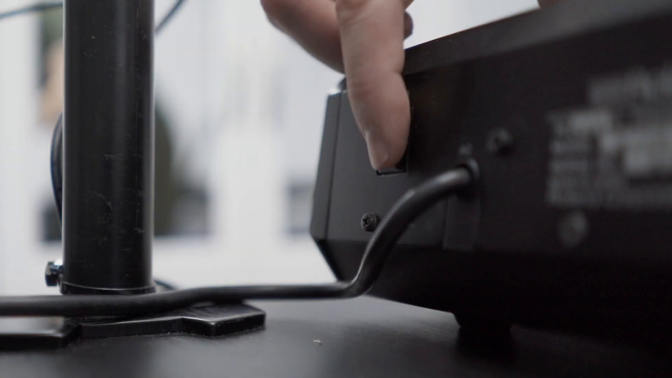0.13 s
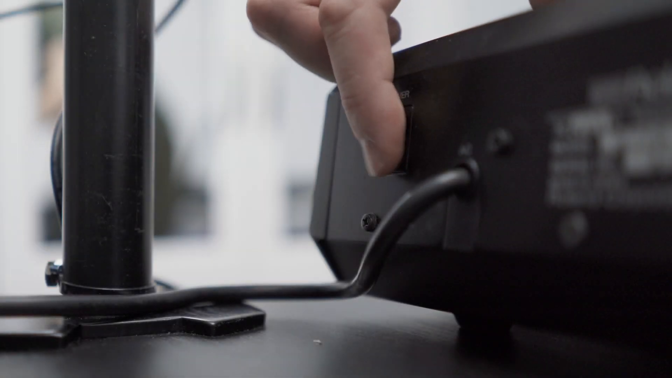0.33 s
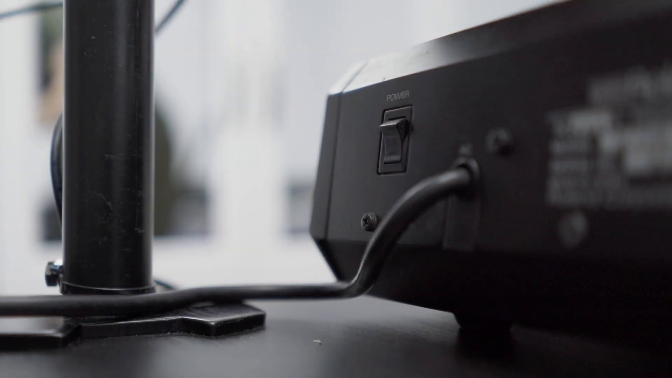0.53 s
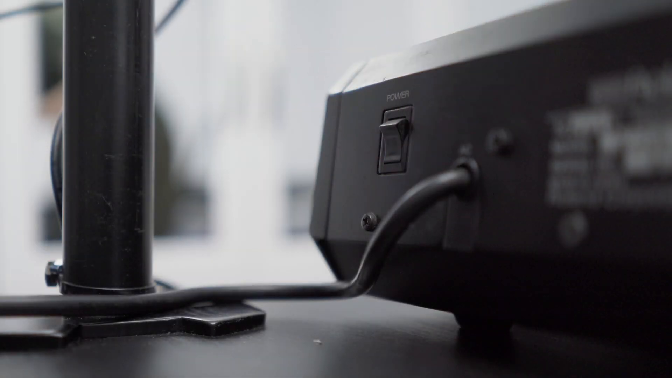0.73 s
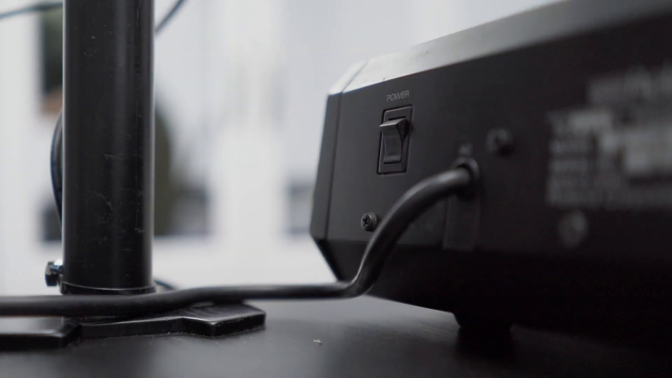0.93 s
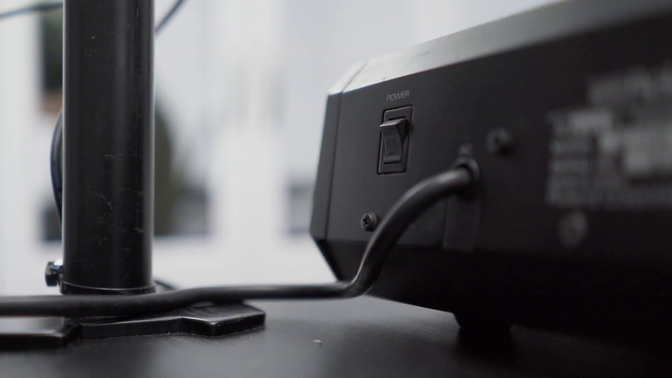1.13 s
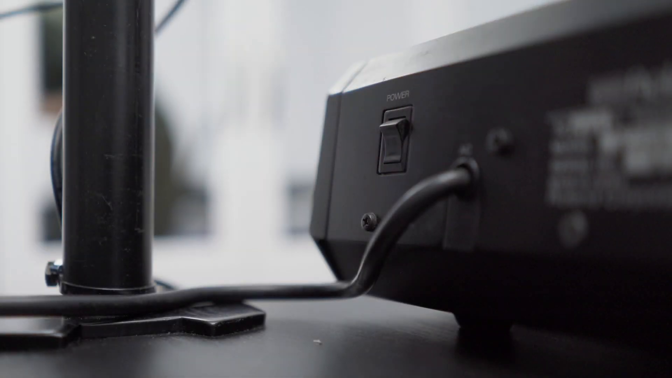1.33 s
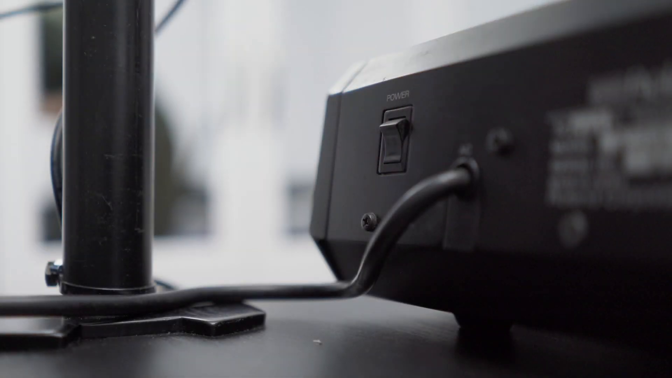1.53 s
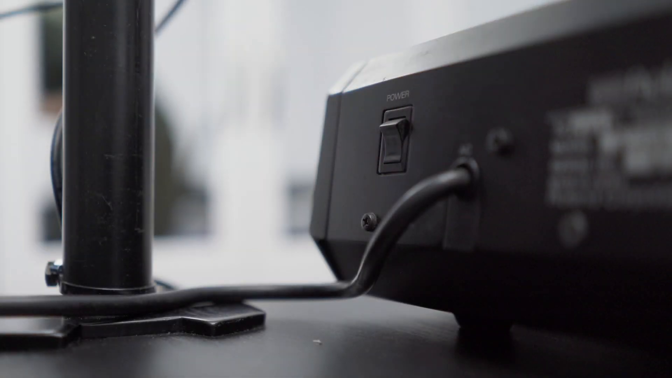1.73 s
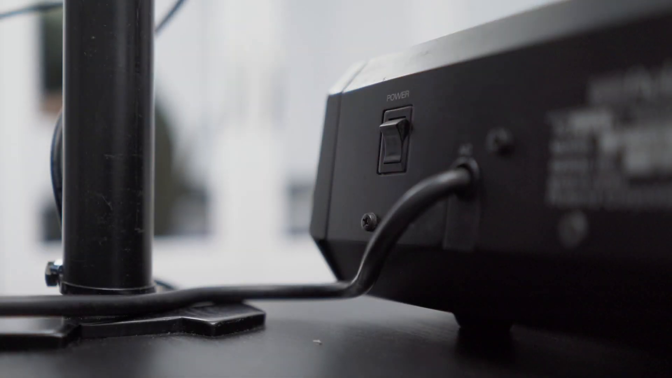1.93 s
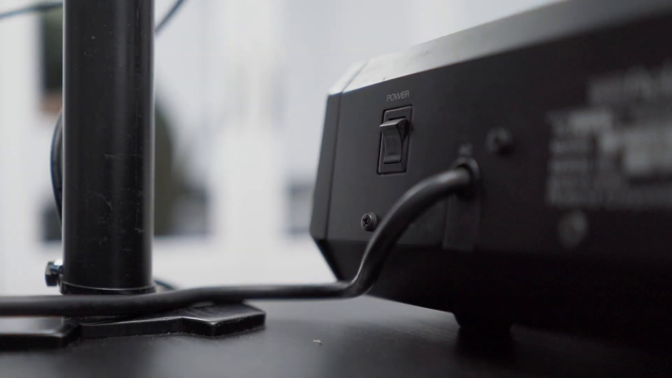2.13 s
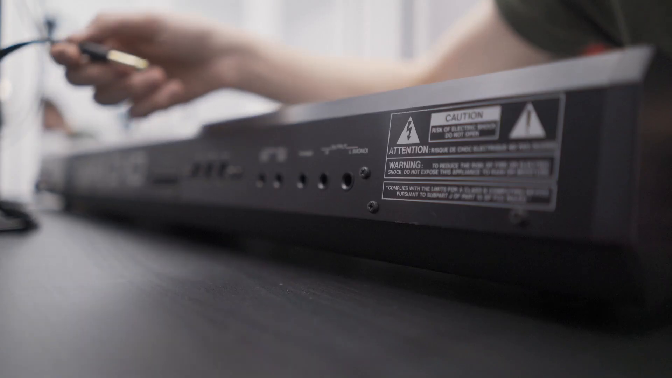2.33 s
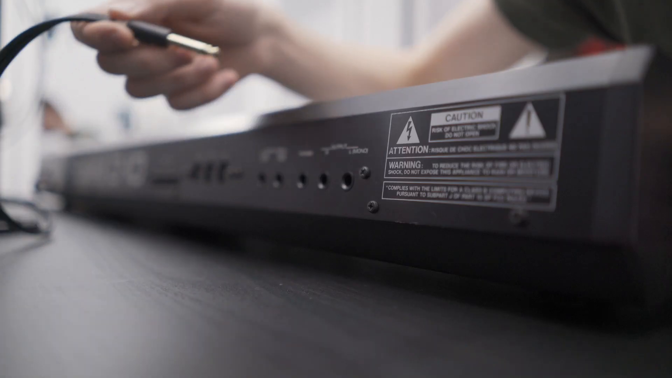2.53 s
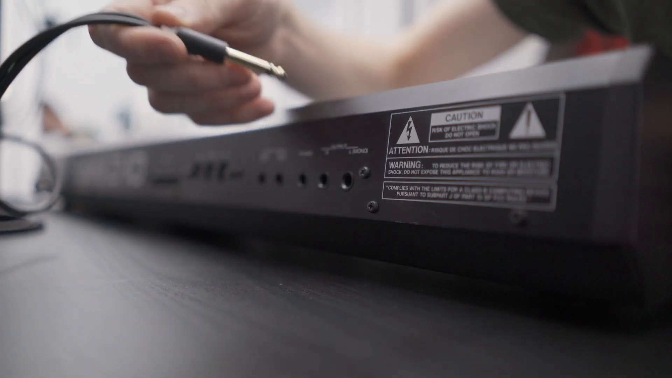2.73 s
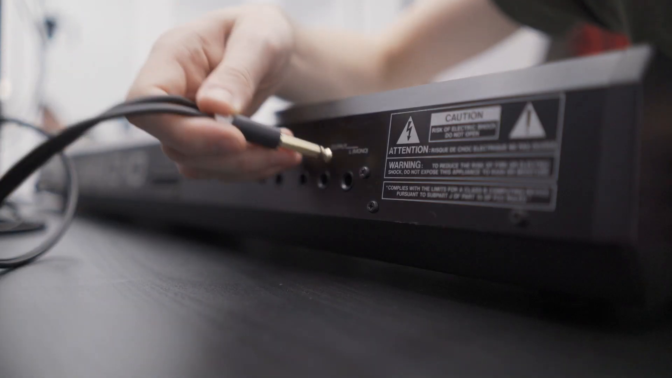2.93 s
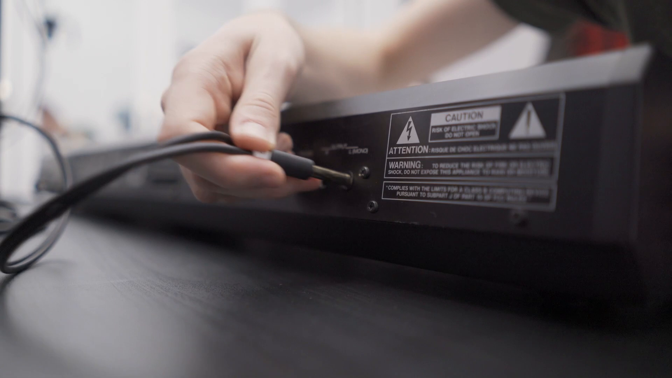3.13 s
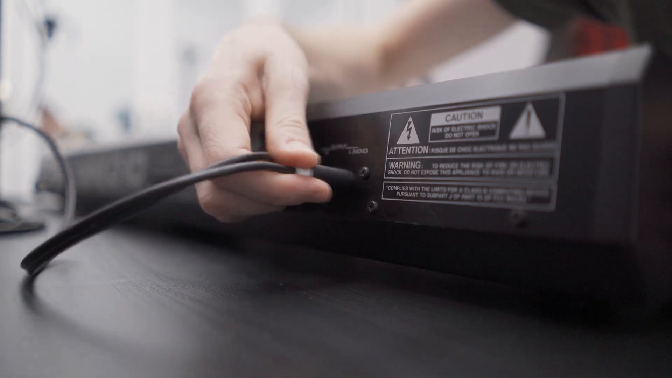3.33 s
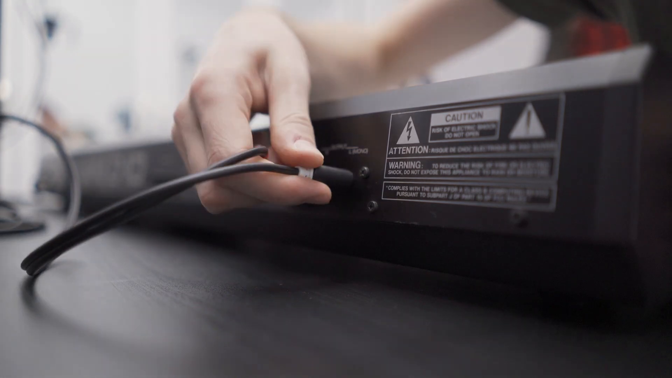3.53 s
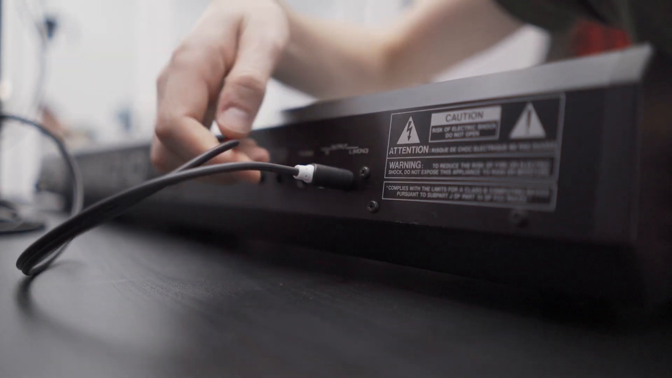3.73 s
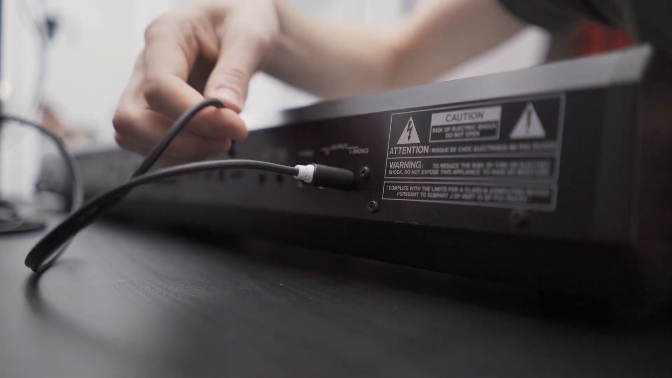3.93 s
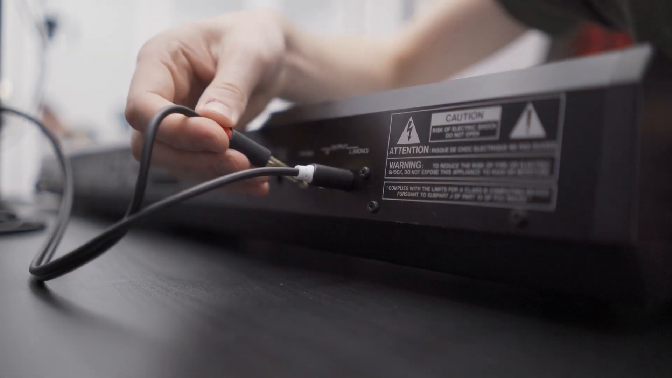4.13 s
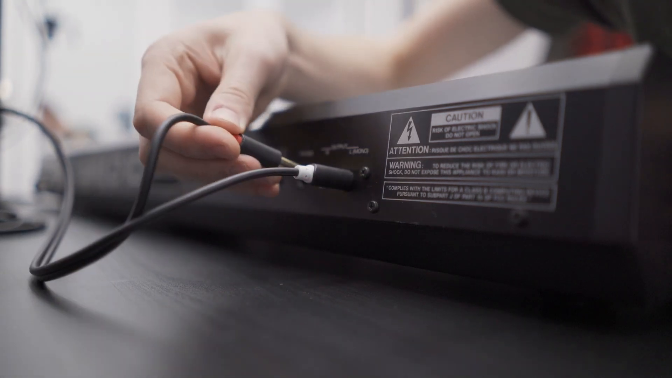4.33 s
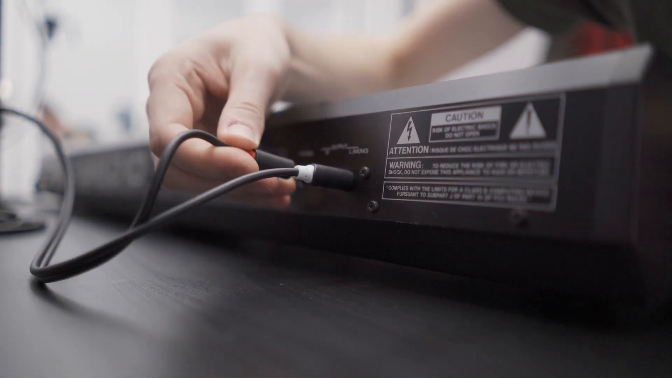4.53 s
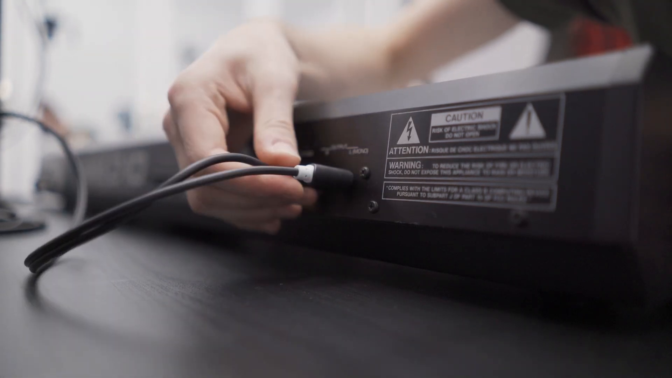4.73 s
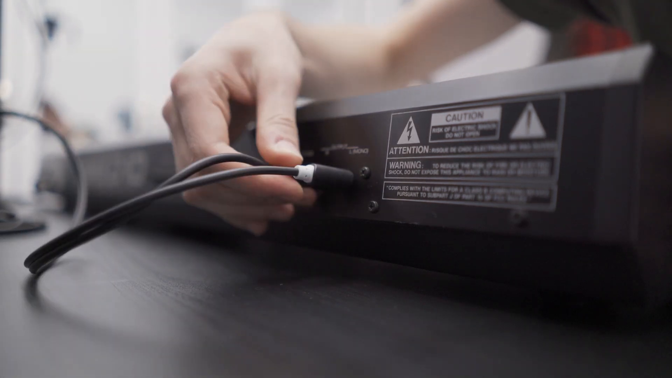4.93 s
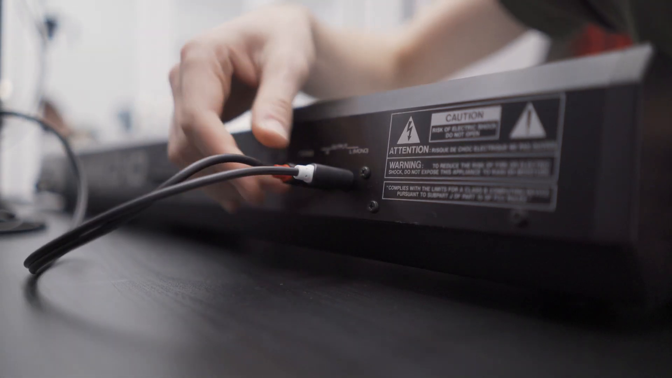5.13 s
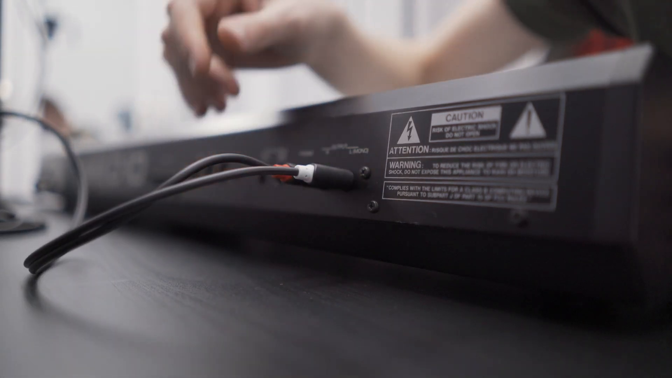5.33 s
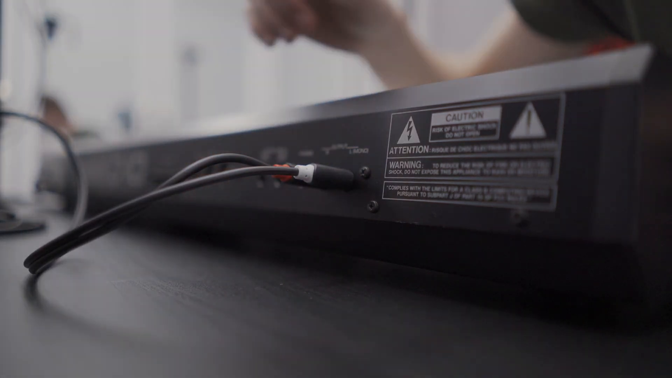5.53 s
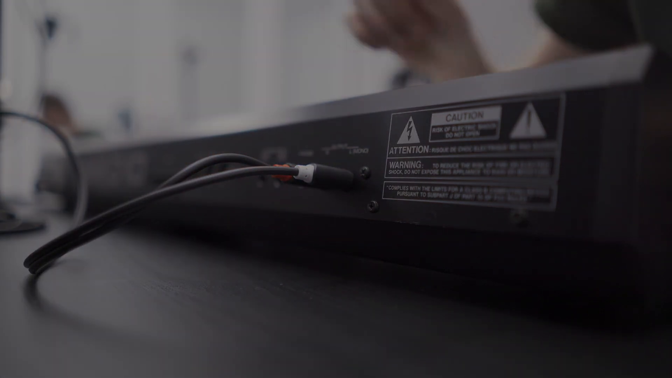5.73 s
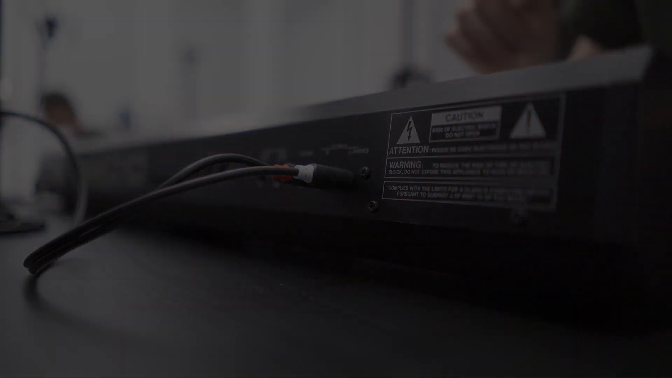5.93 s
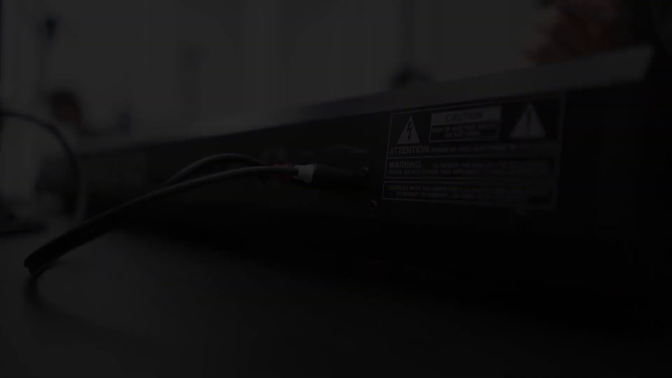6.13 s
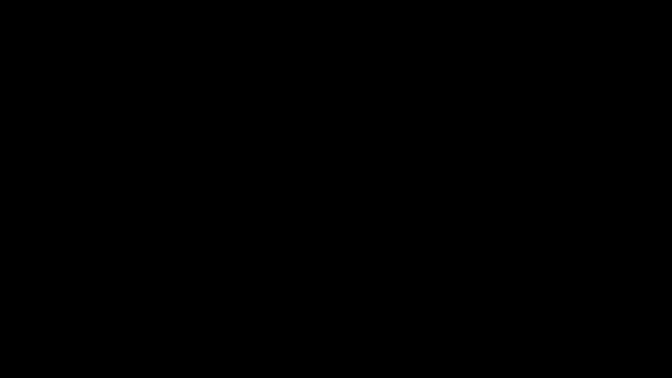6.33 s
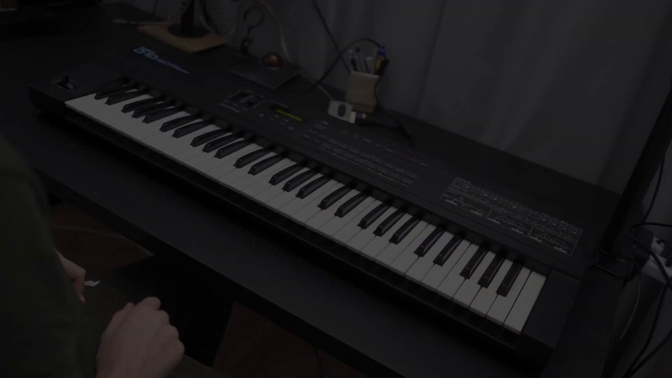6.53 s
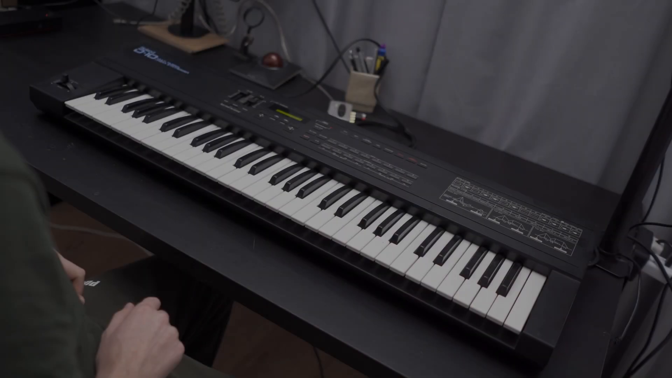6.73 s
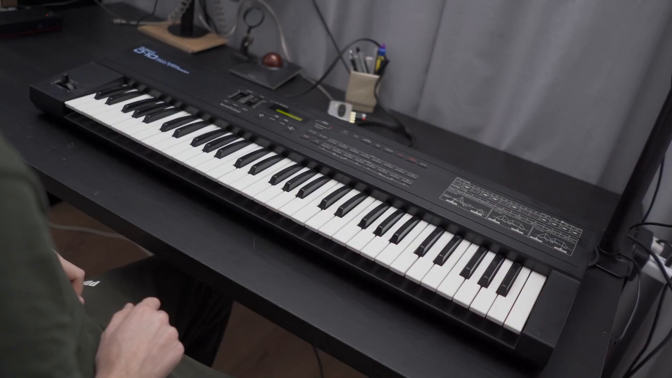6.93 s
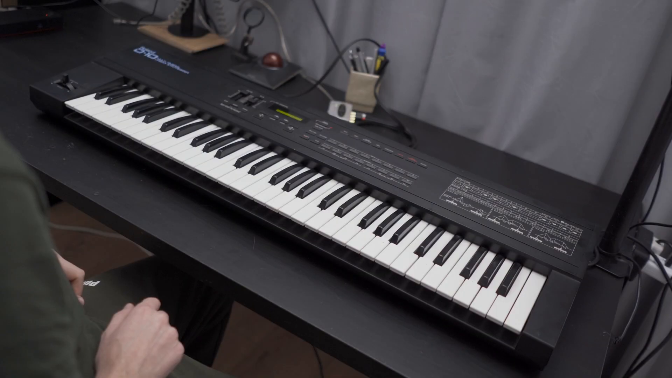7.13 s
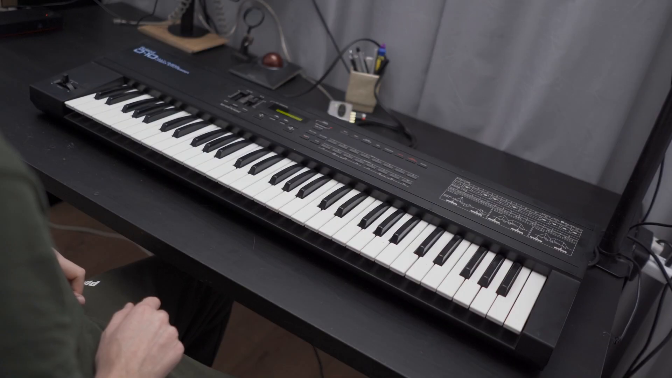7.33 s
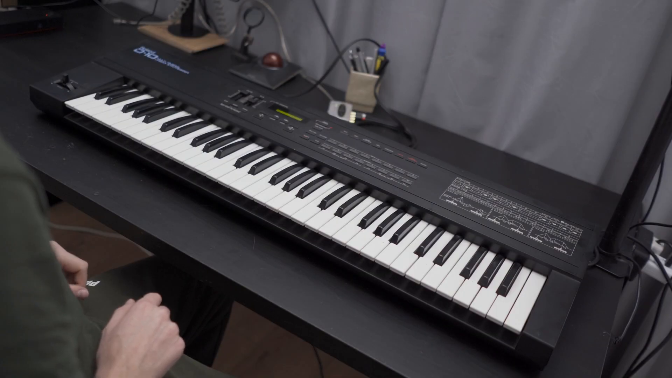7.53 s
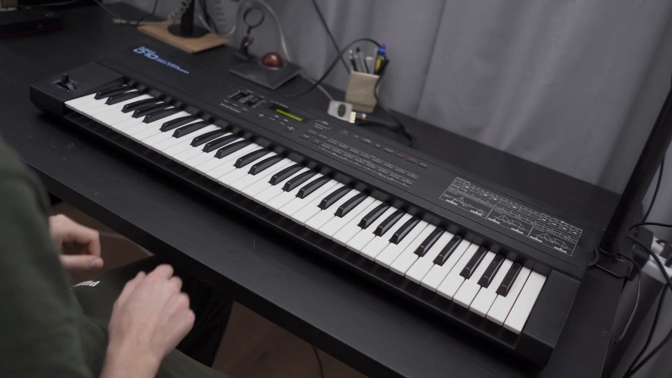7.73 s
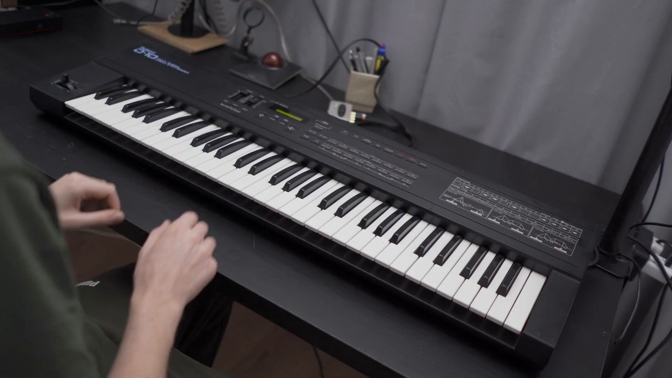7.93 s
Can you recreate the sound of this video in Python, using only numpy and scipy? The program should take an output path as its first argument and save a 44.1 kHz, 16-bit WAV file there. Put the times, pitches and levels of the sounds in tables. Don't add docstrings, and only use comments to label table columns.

```python
import sys
import numpy as np
from scipy import signal
from scipy.fft import rfft, irfft, next_fast_len
from scipy.io import wavfile
from scipy.ndimage import uniform_filter1d, map_coordinates

SR = 44100
rng = np.random.default_rng(int(sys.argv[2]) if len(sys.argv) > 2 else 0)


def transcribe(u):
    v = np.clip(np.atleast_2d(u).T, -1, 1)
    q = np.round(v * 32767).astype(np.int16)
    wavfile.write(sys.argv[1], SR, q)


def amplitude_ratio(level_db):
    exponent = np.asarray(level_db, float) / 20
    return 10 ** exponent


N = 356416


def unit(x):
    return x / np.sqrt(np.mean(x ** 2) + 1e-20)


def along(points, hz):
    point_hz, values = np.transpose(points)
    return np.interp(np.log(hz + 1), np.log(point_hz + 1), values)


def curve(rows, quiet=None):
    time_s, values = np.transpose(rows)
    return np.interp(np.arange(N) / SR, time_s, values, quiet, quiet)


def level(rows):
    return amplitude_ratio(curve(rows, quiet=-140))


def wobble(rate):
    knots = rng.standard_normal(int(N * rate / SR) + 4)
    return map_coordinates(knots, [np.arange(N) * rate / SR])


def tone(hz):
    return np.sin(2 * np.pi * np.cumsum(hz) / SR)


def filtered(x, response):
    size = next_fast_len(x.shape[-1] + 8192)
    spectrum = rfft(x, size) * response(np.fft.rfftfreq(size, 1 / SR))
    return irfft(spectrum, size)[..., :x.shape[-1]]


def resonances(peaks, f):
    total = 0
    for k, (hz, width, db) in enumerate(peaks):
        total = total + (-1) ** k * amplitude_ratio(db) * 1j * f * width / (hz * hz - f * f + 1j * f * width)
    return total


def causal(points, f):
    cepstrum = irfft(np.log(amplitude_ratio(along(points, f))))
    half = len(cepstrum) // 2
    folded = np.concatenate([cepstrum[:1], 2 * cepstrum[1:half], 0 * cepstrum[half:]])
    return np.exp(rfft(folded))


def rush(spectrum, alike):
    def mid_side(hz):
        turn = np.arccos(np.clip(along(alike, hz), -1, 1)) / 2
        return amplitude_ratio(along(spectrum, hz)) * [np.cos(turn), np.sin(turn)]

    mid, side = filtered(rng.standard_normal((2, N)), mid_side)
    return unit(np.array([mid + side, mid - side]))


STROKE_DB = 21.5


def strokes(rows):
    t = np.arange(0, N + 64, 32) / SR
    power = 0
    for s, db, rise, fall in rows:
        distance = np.where(t < s, (s - t) / rise, (t - s) / fall)
        power = power + amplitude_ratio(db - STROKE_DB * distance) ** 2
    return np.interp(np.arange(N) / SR, t, np.sqrt(power))


def burst(t, touch, rise):
    envelope = np.exp(-t / touch) * (1 - np.exp(-t / rise))
    z = rfft(rng.standard_normal((2, len(t))) * envelope)
    even = z / np.sqrt(uniform_filter1d(np.abs(z) ** 2, size=len(t) // 120, axis=1))
    return irfft(even, len(t)) * np.sqrt(touch * SR) * (t < t[-1] / 2)


# time_s, level_db
AIR = [(0.0, -59.5), (0.34, -54.5), (1.08, -63.5), (1.23, -61.5), (1.91, -67), (2.19, -72.5), (2.67, -82),
       (2.8, -79)]
# pitch_hz, level_db per Hz
RUMBLE = [(12, -52), (20, -27), (44, -7), (97, 0.5), (125, -8.5), (197, -4), (229, -16.5), (269, -12),
          (321, -17), (352, -18), (500, -23.5), (650, -61), (1100, -120)]
# pitch_hz, likeness (-1 to 1)
ALIKE = [(60, 0.99), (240, 0.82), (950, -0.34), (3770, -0.45), (15000, -0.87)]
# peak_s, level_db
SHOVES = [(2.98, -51), (3.13, -54.5), (3.27, -48.5), (3.44, -40), (3.61, -63.5), (4.14, -70.5),
          (4.72, -38.5)]
# pitch_hz, level_db per Hz
SHAKE = [(12, -43), (20, -12), (70, -2), (91, -3), (113, -6), (166, -8.5), (199, 1), (220, 2), (290, -27),
         (480, -120)]
# time_s, level_db
MIC = [(0, -79), (.6, -77.5), (1.9, -82), (2.3, -88), (3.8, -89), (4.6, -89)]
# pitch_hz, level_db per Hz
HISS = [(240, -40), (400, -8.5), (1580, -10.5), (1710, -12.5), (2360, -15), (15000, -15), (16000, -33)]
SHOVE_RISE_S, SHOVE_FALL_S, DESK_IDLE_DB = 0.13, 0.15, -92


def room_tone():
    buzz = amplitude_ratio(-3.5 + 2.5 * wobble(8)) * tone(100 + 1.4 * wobble(5.9))
    rumble = amplitude_ratio(1.0 + 1.2 * wobble(6.0)) * rush(RUMBLE, ALIKE)
    air = (level(AIR) + amplitude_ratio(-81.5)) * (rumble + buzz)
    shoves = strokes([(s, db, SHOVE_RISE_S, SHOVE_FALL_S) for s, db in SHOVES])
    desk = (shoves + amplitude_ratio(DESK_IDLE_DB)) * rush(SHAKE, [(60, 1.0)])
    return air + desk + amplitude_ratio(curve(MIC) + 12) * rush(HISS, ALIKE)


# start_s, level_db, pitch_hz, width_hz
TICKS = [(.387, -56, 9000, 7000), (.417, -58, 6500, 4040), (1.597, -49.5, 1300, 600),
         (2.205, -46, 456, 298), (2.204, -41, 1725, 251), (2.522, -37, 275, 60), (2.899, -33, 200, 60),
         (4.125, -49.5, 497, 498), (4.141, -47.5, 347, 300), (5.431, -26.5, 2750, 3000),
         (5.433, -41, 6000, 3000), (5.558, -29, 3280, 1500), (5.559, -43, 4800, 2000)]


def ticks():
    out, t = np.zeros(N), np.arange(1500) / SR
    for s, db, hz, width in TICKS:
        click = burst(t, 0.0027, 0.00033)[0]
        ring = filtered(click, lambda f: resonances([(hz, width, 0)], f) ** 2)
        out[round(s * SR):][:len(t)] += amplitude_ratio(db) * ring
    return out


# peak_s, level_db, rise_s, fall_s, rasp_db
SLIDES = [(1.59, -59.5, 0.011, 0.26, -9), (1.65, -62, .1, 0.15, -5), (2.374, -69.5, .012, .15, -26),
          (2.465, -61.5, 0.055, .15, -15), (2.53, -53.5, .06, 0.35, -6), (2.669, -47.5, 0.17, 0.14, -14.5),
          (2.83, -54, 0.067, 0.16, -20), (3.12, -61.5, 0.35, 0.074, -5), (3.875, -65.5, .11, 0.08, -7.5),
          (4.01, -69.5, .1, 0.12, -20)]
# pitch_hz, level_db per Hz
DESK = [(88, -48), (150, -16.5), (294, -4), (516, -9.5), (759, -2.5), (985, -8), (1310, -2), (1640, -10.5),
        (2250, -8), (4000, -33), (5200, -56.5), (8800, -120)]
# pitch_hz, level_db per Hz
RASP = [(2060, -7), (3500, -2.5), (5130, -11.5), (9380, -16.5), (14000, -36)]


def cable():
    grain = amplitude_ratio(1.4 * wobble(45) + 1.8 * wobble(300))
    rub = unit(grain * rush(DESK, [(200, 1.0), (2000, 0.25)]))
    rasp = unit(grain * rush(RASP, [(4000, 0.23)]))
    slow = [row[:4] for row in SLIDES]
    fast = [(s, db + rasp_db + 3.0, rise, fall) for s, db, rise, fall, rasp_db in SLIDES]
    return amplitude_ratio(2.5) * strokes(slow) * rub + strokes(fast) * rasp


# peak_s, level_db, width_s
SAGS = [(4.745, -6, 0.022), (5.01, -9, 0.018), (5.154, -9.5, .05), (5.5, -2.5, 0.043), (5.55, -4, 0.64),
        (5.84, 4, 0.037), (5.921, -10.5, 0.016), (6.031, -9.5, 0.028), (6.09, 3.5, 0.035),
        (6.16, -6.5, 0.073), (6.28, -7.5, 0.099), (6.585, -8, 0.066), (6.7, -3, 0.076), (6.79, -5, 0.046),
        (6.85, -2, 0.47), (7.05, 4, .06), (7.104, -6.5, .03), (7.28, -3.5, 0.057), (7.458, -8, 0.11),
        (7.565, -5, .03), (7.675, -11.5, 0.066), (8.0, -6, 0.036)]
HUM_HZ, HUM_DB, HUM_ON_S = 201.3, 27, 4.67


def hum():
    t = np.arange(N) / SR
    coarse = t[::32]
    sags = sum(db * np.exp(-(2 * (coarse - s) / width) ** 2) for s, db, width in SAGS)
    sag_db = np.interp(t, coarse, sags)
    on = np.clip((t - HUM_ON_S) / 0.015, 0.15, 1)
    hz = HUM_HZ + 4.5 * wobble(70) + 0.75 * wobble(9)
    return on * amplitude_ratio(HUM_DB + 3.5 + sag_db + 1.4 * wobble(17)) * tone(hz)


# time_s, level_db of its hiss
LINE = [(4.46, -84.5), (4.52, -75), (4.66, -59), (4.72, -63.5), (5.07, -57), (5.6, -51), (6.04, -50),
        (8.08, -50)]
# pitch_hz, level_db
PINK = [(15, 37), (30, 38.5), (60, 31.5), (130, 27), (470, 14), (1500, 7), (4000, 1.5), (12000, -4),
        (16000, -6.5)]
# pitch_hz, width_hz, level_db
HOLLOW = [(49.2, 23, 31.5), (159.8, 65, 32), (218, 44, 38.5), (231, 18, 35), (297, 98, 31),
          (331.6, 42, 33.5), (615, 67, 19), (692, 106, 25.5), (990, 190, 17), (1147, 94, 16)]
# pitch_hz, level_db
WHINE = [(1863, -76), (2196, -75), (2320, -69)]


def line_noise():
    def colour(f):
        power = amplitude_ratio(along(PINK, f)) ** 2
        for peak in HOLLOW:
            power = power + np.abs(resonances([peak], f)) ** 4 / amplitude_ratio(peak[2]) ** 2
        return np.sqrt(power)

    t = np.arange(N) / SR
    whine = sum(amplitude_ratio(db + 54.5) * np.sin(2 * np.pi * hz * t) for hz, db in WHINE)
    return level(LINE) * (hum() + filtered(rng.standard_normal(N), colour) + whine)


# pitch_hz, t60_s
ROOM = [(80, 0.78), (200, 0.62), (500, 0.3), (1500, 0.17), (4000, 0.22), (12000, 0.18)]


def room(x, mono_hz, late_db):
    hz, t, z = signal.stft(rng.standard_normal((2, len(x))), SR, nperseg=256)
    z[1] *= 1 / (1 + (mono_hz / (hz[:, None] + 1)) ** 4)
    fall_db = -60 * t / along(ROOM, hz)[:, None]
    build_up = 1 - 0.52 * np.exp(-t / 0.026)
    decay = amplitude_ratio(fall_db) + amplitude_ratio(late_db + 0.3 * fall_db)
    mid, side = signal.istft(z * build_up * decay, SR, nperseg=256)[1]
    tail = np.array([mid + side, mid - side]) / np.linalg.norm(mid)
    return signal.fftconvolve(x[None], tail, axes=1)[:, :len(x)]


# pitch_hz, level_db, t60_s
SPRINGS = [(237, 0, .4), (388, -5, .5), (490, -9, .4), (937, -14, .5), (1082, -14, 1.1), (1416, -16, 1.2),
           (1631, -16, .6), (2170, -19, .45)]


def springs(s, blow_db):
    out, t = np.zeros(N + 2 * SR), np.arange(SR * 3 // 2) / SR
    ring = 0
    for hz, db, t60 in SPRINGS:
        pair = np.sin(2 * np.pi * hz * t) + 0.35 * np.sin(2 * np.pi * (hz + 7) * t)
        ring = ring + amplitude_ratio(db - 60 * t / t60) * pair
    out[round(s * SR):][:len(t)] = amplitude_ratio(blow_db) * ring
    return out[:N]


TOUCH_PER_DB = 0.0336
CAVITY_HZ = 745
CAVITY_GROWS = 0.86


def contacts(rows, body, metal, touch_s, gain_db, bare_db, snap_db, cavity_db, springs_db, wet_db,
             far_snap_db, late_db, pan_db):
    out, t = np.zeros((2, N + SR)), np.arange(SR * 11 // 20) / SR

    def edges(f):
        power = amplitude_ratio(-18.0)
        for peak in metal:
            power = power + np.abs(resonances([peak], f)) ** 2
        return np.sqrt(power)

    for s, db, thud_db, click_db, sizzle_db in rows:
        touch = np.clip(touch_s * (1 - TOUCH_PER_DB * sizzle_db), 0.0005, 0.05)
        push = burst(t, touch, 0.00033)
        crack = burst(t, 0.5 * touch, 0.00073)
        low = [(60, thud_db - 15.5), (300, thud_db), (800, -3.5), (2200, -4), (3000, -13), (4500, -23.5),
               (16000, -59)]
        high = [(1200, -37.0), (2800, click_db + 8), (5000, click_db - 0.5), (7500, sizzle_db + 2.0),
                (15000, sizzle_db - 5.5)]
        push = push[0] + filtered(push - push[0], lambda f: 0.55 / (1 + (650 / (f + 1)) ** 4))
        knock = filtered(push, lambda f: causal(low, f) * (resonances(body, f) + amplitude_ratio(bare_db)))
        knock = amplitude_ratio(db + gain_db) * knock
        snap = amplitude_ratio(db + snap_db) * filtered(crack, lambda f: causal(high, f) * edges(f))
        swell = amplitude_ratio(CAVITY_GROWS * (db + 12) - 12.5 + cavity_db) * np.exp(-((t - 0.017) / 0.0061) ** 2)
        swell = swell * np.sin(2 * np.pi * CAVITY_HZ * t)
        far = np.pad(knock[0] + amplitude_ratio(far_snap_db) * snap[0], (150, 0))[:len(t)]
        heard = knock + snap + swell + amplitude_ratio(wet_db) * room(far, 620, late_db)
        out[:, round(s * SR):][:, :len(t)] += amplitude_ratio([[pan_db], [-pan_db]]) * heard
    hardest_s, hardest_db = max(rows, key=lambda row: row[1])[:2]
    return out[:, :N] + springs(hardest_s, hardest_db + springs_db)


# start_s, level_db, thud_db, click_db, sizzle_db
SWITCH = [
    (.15, -36.5, 0, -34, -29),
    (.2012, -25, -23.5, -4.5, -10),
    (.2055, -13.5, -14.5, -4.5, -9.5),
]
# pitch_hz, width_hz, level_db
ROCKER = [(240.4, 14, 11), (480, 65, -1.5), (1135, 51, -9), (1500, 250, 1.5), (1710, 250, -0.5),
          (2230, 160, -3), (2800, 170, -7)]
# pitch_hz, width_hz, level_db
LEVER = [(3900, 880, -2.5), (5360, 630, 3.5), (7600, 1200, -0.5), (11000, 1200, -0.5), (13700, 2900, 4.5)]


def rocker_switch():
    return contacts(SWITCH, ROCKER, LEVER, touch_s=0.0017, gain_db=15.5, bare_db=-10.5, snap_db=6.5,
                    cavity_db=-37.5, springs_db=-47.5, wet_db=0.5, far_snap_db=-4.0, late_db=-18.5, pan_db=-1.0)


# pitch_hz, width_hz, level_db
PANEL = [(311.4, 60, 4), (767, 19, 4.5), (945, 22, -4), (1199, 69, 1), (1494, 45, -3.5), (1815, 50, -6),
         (2190, 46, -40), (2200, 51, -24.5), (4150, 68, -21.5), (4670, 68, -30)]
# start_s, level_db, thud_db, click_db, sizzle_db
TIP = [
    (2.371, -63, 15, -25.5, -23.5),
    (2.899, -20, -12.5, -8.5, -16.5),
]
# pitch_hz, width_hz, level_db
TIP_METAL = [(3680, 530, -1.5), (5486, 1500, -7), (8040, 2500, -3)]


def plug_tip():
    return contacts(TIP, PANEL, TIP_METAL, touch_s=0.0022, gain_db=12.5, bare_db=-1.0, snap_db=9.0,
                    cavity_db=-32, springs_db=-43, wet_db=-10.5, far_snap_db=3.0, late_db=-28.0, pan_db=1.0)


# start_s, level_db, thud_db, click_db, sizzle_db
PLUG_1 = [(3.1395, -29, -23, -13, -23.5), (3.1965, -23.5, -14, -12.5, -19.5),
          (3.203, -21.5, -12.5, -9.5, -21), (3.281, -19, -14.5, -16, -23.5),
          (3.2895, -20, -10.5, -0.5, -9.5), (3.297, -26, 4, -14, -25.5), (3.3725, -21.5, -5.5, -5.5, 0.5),
          (3.3975, -9, -21.5, -17, -19), (3.4028, -11, -15, -20, -25.5)]
# pitch_hz, width_hz, level_db
SLEEVE = [(3170, 310, -2.5), (4900, 350, 0.5), (6205, 460, -1), (7575, 550, 3.5), (9900, 600, -4.5),
          (10900, 600, -3.5), (13130, 2400, 3), (15100, 800, 2.5)]


def first_plug():
    return contacts(PLUG_1, PANEL, SLEEVE, touch_s=0.0029, gain_db=15.5, bare_db=-8, snap_db=4.5,
                    cavity_db=-13.0, springs_db=-30.5, wet_db=-8.5, far_snap_db=-2.5, late_db=-33.5, pan_db=-0.34)


# start_s, level_db, thud_db, click_db, sizzle_db
PLUG_2 = [(4.4395, -46.5, -22, -12.5, -14.5), (4.5125, -40, -17, 2, -9.5), (4.517, -28.5, -12, -4.5, -22),
          (4.585, -40.5, 3, -6, -19), (4.644, -21, -10, -20, -19), (4.652, -26, -7, 0.5, -22),
          (4.659, -14, -11.5, -11, -20), (4.668, -21, -4, -20, -34), (4.695, -24, -7, -1, -1),
          (4.738, -41, -7, -1, 6), (4.748, -10, -22, -7, -12), (4.7535, -13, -10, -11, -22)]


def second_plug():
    return contacts(PLUG_2, PANEL, SLEEVE, touch_s=0.003, gain_db=17.5, bare_db=-11.0, snap_db=3,
                    cavity_db=-11.5, springs_db=-33, wet_db=-7.0, far_snap_db=-5.5, late_db=-50, pan_db=-0.7)


HISS_TOP_HZ = 15700


def scene():
    steady = filtered(room_tone() + cable() + line_noise(), lambda hz: hz < HISS_TOP_HZ)
    return steady + ticks() + rocker_switch() + plug_tip() + first_plug() + second_plug()


def roll_off(x):
    return signal.sosfilt(signal.butter(12, 16670, fs=SR, output="sos"), x)


TOP_HZ = 16050


def record(dry):
    mix = filtered(dry, lambda hz: np.clip((TOP_HZ + 300 - hz) / 600, 0, 1) ** 2)
    return roll_off(mix)


dry = scene()
out = record(dry)
transcribe(out)
```